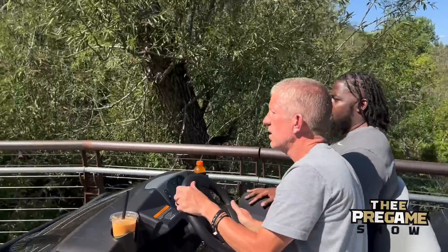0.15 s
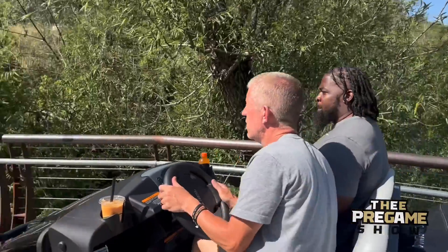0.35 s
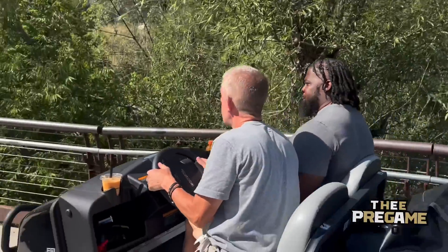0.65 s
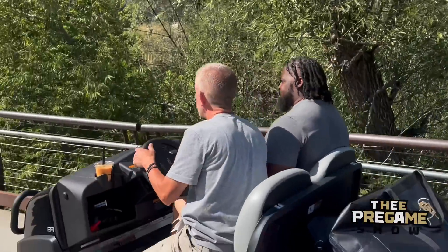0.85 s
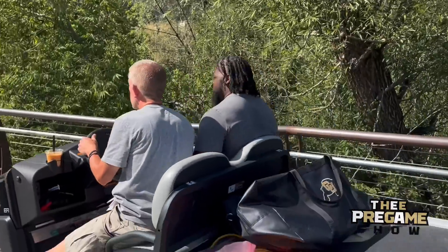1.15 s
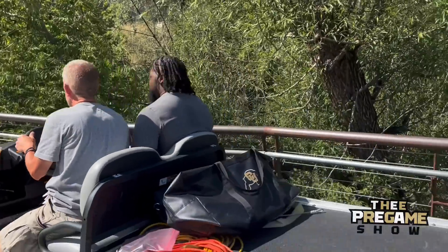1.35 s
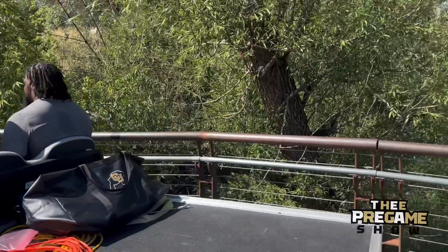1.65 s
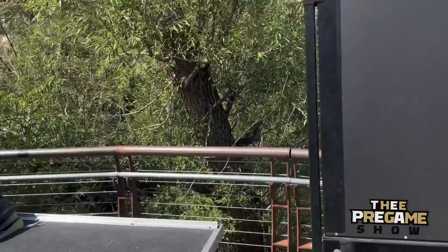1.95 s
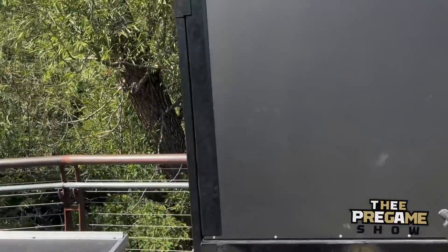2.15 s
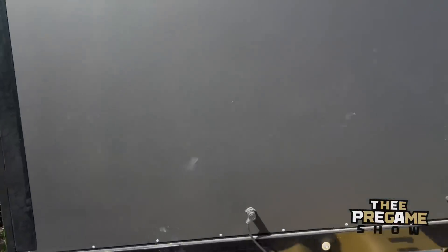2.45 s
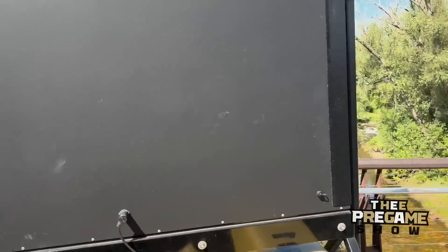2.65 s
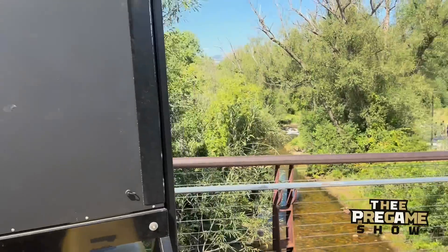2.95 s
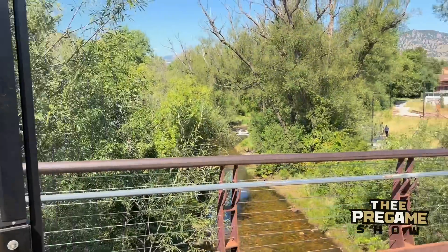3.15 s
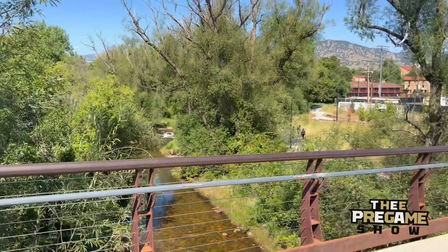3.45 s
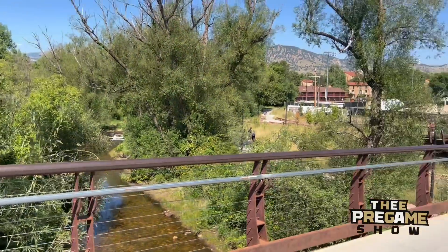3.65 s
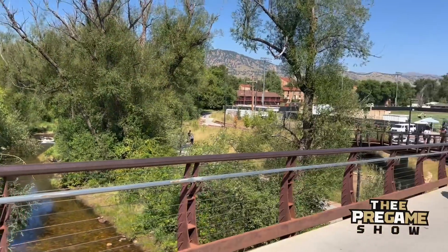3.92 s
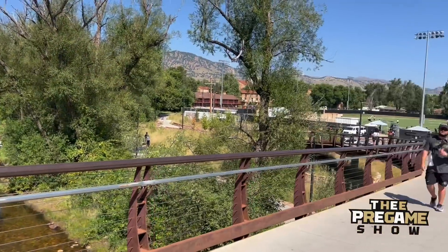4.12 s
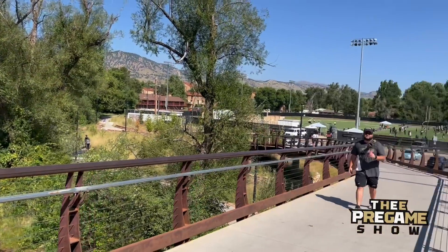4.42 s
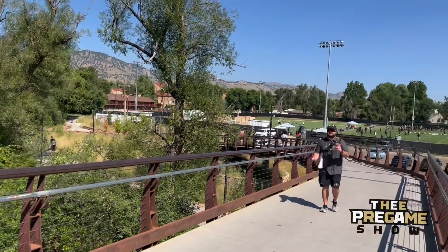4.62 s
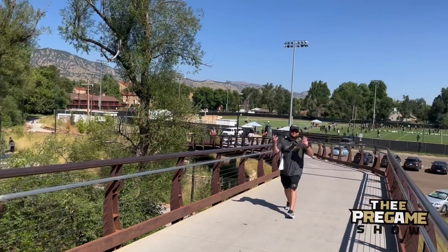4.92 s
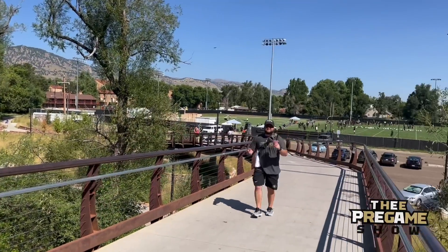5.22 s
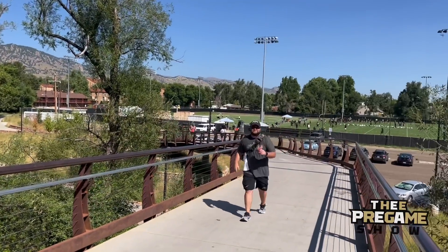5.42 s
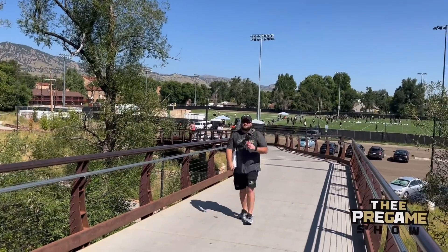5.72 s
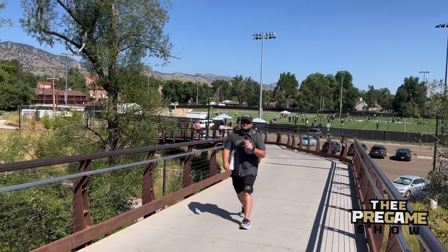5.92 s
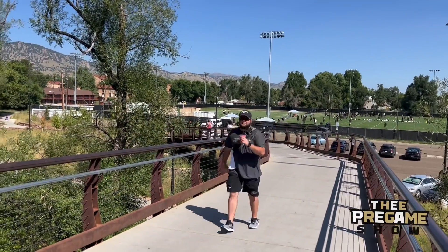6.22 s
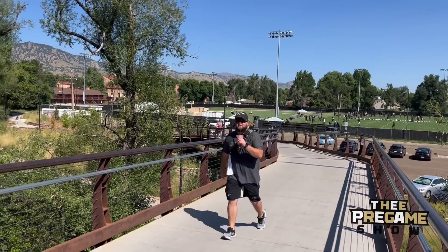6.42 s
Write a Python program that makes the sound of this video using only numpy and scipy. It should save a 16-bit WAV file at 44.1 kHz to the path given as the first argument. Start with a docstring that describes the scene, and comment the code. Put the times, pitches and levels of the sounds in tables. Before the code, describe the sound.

From 0 s a small single-cylinder utility cart engine runs close by in the open air, about fourteen firings a second: a low puttering exhaust, hollow intake puffs, tapping valves, bright casing rattle and a thin pulsing hiss. A faint steady wash of stream and leaves lies under it. Between 1.2 and 2 s its tail turns to the listener; the exhaust strengthens and a narrow hollow ring near 1.3 kHz glides slightly upward, gone by 2.5 s. The engine shifts to the left, and from about 2.5 s the rattle is partly shielded. From 3 to 4 s clatter and treble fall away, leaving a softer, duller chug that slows slightly until 5 s. At 5.2 s comes a tiny squeak, at 5.3 s a quick soft wheel knock. The throttle then opens; from 5.5 s the firings quicken to nearly twenty-five a second, the note rising into a fuller growl at 6.6 s, cut off while still revving.

```python
"""A single-cylinder utility cart idles past on a footbridge, over a steady wash of stream and leaves.
First it is heard from beside: firings sound the exhaust pipe, intake strokes ring the air box,
valves tap, the casing rattles and gas hisses once a cycle.
Its tail then turns to the listener, a hollow rings with rising pitch, and the cart moves away to the left.
Near the end a spring squeaks, a wheel knocks on the deck, the throttle opens and the engine revs up."""
import sys
import numpy as np
from scipy import signal
from scipy.fft import rfft, irfft, next_fast_len
from scipy.io import wavfile
from scipy.ndimage import uniform_filter1d

SR = 44100
rng = np.random.default_rng(int(sys.argv[2]) if len(sys.argv) > 2 else 0)


def magnitude_from_level(level_db):
    """Linear magnitude for a level in decibels (20 dB per decade)."""
    exponent = np.asarray(level_db, float) / 20
    return 10 ** exponent


def store_wav(level_fs):
    """Save 16-bit WAV to argv[1]."""
    pcm = np.round(np.clip(np.atleast_2d(level_fs), -1, 1) * 32767)
    wavfile.write(sys.argv[1], SR, pcm.T.astype(np.int16))


N = 290177

# The tail turns to the listener, later the throttle opens: from and to, s
TURN_S, THROTTLE_S = (1.237, 1.94), (5.2, 5.75)
# Where the valves first tap, and how much later their second hump follows: shares of a cycle
VALVE_AT, VALVE_OPEN = 1, 0.39
# Heard from behind, these parts speak earlier by a share of a cycle
INTAKE_EARLY, VALVE_EARLY, CASING_EARLY = 0.1203, 0.068, 0.11


def amp_of(points, hz):
    """Spectral envelope: gain of a (Hz, dB) curve read on a logarithmic frequency axis."""
    p = np.array(points)
    return magnitude_from_level(np.interp(np.log(np.maximum(hz, 1)), np.log(p[:, 0]), p[:, 1]))


def rms_one(x):
    """Normalisation: scale to unit rms over all channels."""
    return x / np.sqrt(np.mean(x ** 2) + 1e-20)


def in_time(rows):
    """Linear interpolation: each column of a table as a curve over the whole scene."""
    s, *columns = np.transpose(rows)
    return [np.interp(np.arange(N) / SR, s, c) for c in columns]


def ramp(span):
    """Linear transition: 0 before the span, 1 after it."""
    return np.interp(np.arange(N) / SR, span, [0, 1])


def colour(x, points):
    """Zero-phase filtering: multiply the spectrum by a (Hz, dB) curve."""
    size = next_fast_len(N)
    hz = np.arange(size // 2 + 1) * SR / size
    return irfft(rfft(x, size) * amp_of(points, hz), size)[..., :N]


def pair(alike, lag):
    """Interaural coherence: noise with a shared part, lag samples later on the left, and private parts."""
    alike = np.clip(alike, 0, 1)
    shared, left, right = rng.standard_normal((3, N))
    late = shared[np.clip(np.arange(N) - np.round(lag).astype(int), 0, N - 1)]
    return np.sqrt(alike) * np.array([late, shared]) + np.sqrt(1 - alike) * np.array([left, right])


def burst(cycles, at, sharp, spread_db, steady_db, echo_db=-40):
    """Cyclic modulation: two humps a cycle, their strength drawn anew each cycle, over a steady part."""
    turn = cycles - at + .5
    strength = magnitude_from_level(spread_db * rng.standard_normal(200))[turn.astype(int)]
    hump = np.exp(sharp * (-np.cos(2 * np.pi * turn) - 1))
    second = magnitude_from_level(echo_db) * np.exp(sharp * (-np.cos(2 * np.pi * (turn - VALVE_OPEN)) - 1))
    return rms_one(magnitude_from_level(steady_db) + strength * (hump + second))


def resonate(x, hz, width_hz):
    """Damped resonance: a two-pole filter with unit gain at its peak."""
    r = np.exp(-np.pi * width_hz / SR)
    feedback = [1, -2 * r * np.cos(2 * np.pi * hz / SR), r * r]
    return signal.lfilter(np.array([1, 0, -1]) * (1 - r * r) / 2, feedback, x)


def metal(cycles, at, spectrum, modes, lag, modes_db, sharp, steady_db, echo_db, alike):
    """Modal excitation: noise pulsed by the cycle, heard in a broad colour and through ringing modes."""
    pulsed = pair(alike, lag) * burst(cycles, at, sharp, 2.1, steady_db, echo_db)
    broad = rms_one(colour(pulsed, spectrum))
    push = pair(alike, lag)
    rings = 0
    for hz, width_hz, db in modes:
        # each mode has stroke strengths of its own
        stroke = push * burst(cycles, at, sharp, 2.2, steady_db - 6, echo_db)
        rings = rings + magnitude_from_level(db) * resonate(stroke, hz, width_hz)
    return rms_one(broad + magnitude_from_level(modes_db) * rms_one(rings))


# Colour of stream and leaves. Columns: frequency_hz, density_db (per Hz)
OUTDOORS_SPECTRUM = [(24, -32), (40, 0), (124, -11.5), (180, -9.5), (270, -23.5), (450, -25), (750, -32.5),
                     (1000, -27.5), (1200, -22.5), (1520, -23), (1780, -31), (2300, -35.5), (3800, -40),
                     (5500, -37.5), (9000, -41), (11000, -88)]
# Part not shared by the microphones; the bass is nearly the same at both. Columns: frequency_hz, level_db
OUTDOORS_APART = [(60, -16), (250, 4), (1000, 4)]


def outdoors():
    """Diffuse field: stationary noise whose bass is coherent between two microphones."""
    wash = pair(0.39, 0)
    common = wash.mean(axis=0)
    wash = common + colour(wash - common, OUTDOORS_APART)
    return magnitude_from_level(-38.5) * rms_one(colour(wash, OUTDOORS_SPECTRUM))


# A wheel knocks over a joint in the deck. Columns: start_s, level_db
WHEEL_KNOCKS = [(5.302, -34), (5.336, -36), (5.37, -39)]
# Ringing modes of the deck. Columns: frequency_hz, level_db, t60_s
DECK_MODES = [(249.5, 6.5, 0.06), (372, 7, 0.066), (481, 6, 0.064), (534, 10, 0.042)]


def bump():
    """Impulse response: each wheel knock sets the deck modes ringing with exponential decay."""
    out, t = np.zeros(N), np.arange(SR // 5) / SR
    for start_s, knock_db in WHEEL_KNOCKS:
        i = round(start_s * SR)
        for hz, db, t60 in DECK_MODES:
            envelope = magnitude_from_level(knock_db + db - 60 * t / t60) * (1 - np.exp(-t / 0.0067))
            out[i:i + len(t)] += envelope * np.sin(2 * np.pi * hz * t)
    return out


def squeak():
    """Sustained oscillation: a spring gives one short thin tone just before the wheel knocks."""
    share = ramp((5.23, 5.305))
    envelope = np.sin(np.pi * share) ** .5 * (share < 1)
    return magnitude_from_level(-49) * envelope * np.sin(2 * np.pi * 730 * np.arange(N) / SR)


# Resonance of a hollow under the seat. Columns: time_s, pitch_hz, level_db
HOLLOW_PATH = [(.75, 1256, -55), (1.05, 1279, -42), (1.75, 1387, -38), (2.2, 1405, -40.5),
               (2.45, 1426, -55)]


def hollow(cycles, lag, width_hz):
    """Cavity resonance: valve taps ring a hollow whose pitch slides up as the cart turns past."""
    hz, level_db = in_time(HOLLOW_PATH)
    taps = burst(cycles, VALVE_AT, 1.8, 2.7, -14, -31)
    r = np.exp(-np.pi * width_hz / SR)
    # narrow noise carried up to the moving pitch
    cos_part, sin_part = (signal.lfilter([1 - r], [1, -r], pair(0.73, lag) * taps) for _ in range(2))
    phase = 2 * np.pi * (np.cumsum(hz) - hz * np.array([lag, 0 * lag])) / SR
    return magnitude_from_level(level_db) * rms_one(cos_part * np.cos(phase) + sin_part * np.sin(phase))


# Colour of the gas hiss. Columns: frequency_hz, density_db (per Hz)
JET_SPECTRUM = [(3500, -10.5), (4900, -0.5), (7000, 1.5), (8200, -13.5), (10000, -46), (12500, -45),
                (17000, -45)]
# Ringing modes of the tailpipe. Columns: frequency_hz, width_hz, level_db
TAILPIPE_MODES = [(4920, 55, 4), (5430, 45, 0), (6010, 55, 4), (6860, 130, -0.5), (7730, 180, -2)]


def jet(cycles, load):
    """Jet noise: gas hisses through the tailpipe once a cycle, 8 dB louder under load."""
    hiss = metal(cycles, 0.21, JET_SPECTRUM, TAILPIPE_MODES, 0,
                 modes_db=-4, sharp=1.5, steady_db=-3, echo_db=-40, alike=.6)
    return magnitude_from_level(-56 + 8 * load) * hiss * magnitude_from_level([[3], [-8]])  # stronger on the left


# Colour of the casing rattle. Columns: frequency_hz, density_db (per Hz)
RATTLE_SPECTRUM = [(2500, -9), (3400, 0.5), (4400, 2), (5500, -6), (8000, 2.5), (9500, -2.5), (12000, 14.5),
                   (16000, -38), (17000, -40)]
# Ringing modes of the engine casing. Columns: frequency_hz, width_hz, level_db
CASING_MODES = [(3353, 29, 11), (3670, 90, 10), (4270, 78, 11.5), (4990, 84, 6), (6260, 41, 5),
                (7880, 300, 1)]
# Top treble of the casing against the rest. Columns: time_s, level_db
TOP_TREBLE = [(0, -17), (2.0, -19), (2.9, -19), (3.4, -17), (3.8, -34), (4.3, -41), (5.2, -31), (6.58, -33)]


def rattle(cycles, fall_db, load):
    """Structure-borne sound: the casing rattles once a cycle and falls 0.66 dB per dB of clatter lost."""
    level_db = -42 + 0.66 * fall_db
    level_db = level_db - 5.5 * ramp((2.46, 2.86)) + 4.5 * load  # the trailer hides the casing; load
    casing = metal(cycles + CASING_EARLY * ramp(TURN_S), 0.4, RATTLE_SPECTRUM, CASING_MODES, 0,
                   modes_db=-8, sharp=1.2, steady_db=-1, echo_db=-40, alike=.8)
    # distance takes the highest treble first
    treble = colour(casing, [(7000, -60), (10000, 0)])
    treble_db, = in_time(TOP_TREBLE)
    return magnitude_from_level(level_db) * (casing + (magnitude_from_level(treble_db) - 1) * treble)


# The engine passes. Columns: time_s, low_clatter_db, mid_clatter_db, left_lag_samples
PASS = [(0, -37.5, -35, 6), (.4, -34.5, -38, 9), (1.2, -36, -39.5, 1.5), (1.85, -34.5, -35, -5),
        (2.2, -35, -37.5, -11), (2.5, -37, -32, -16.5), (2.9, -36.5, -36, -20.5),
        (3.25, -39.5, -37.5, -19.5), (3.6, -42.5, -45, -19.5), (4.1, -48, -45.5, -17.5),
        (5.3, -48.5, -46.5, -12.5), (5.9, -47.5, -46, -16), (6.58, -46, -49, -14)]


def passing():
    """Source motion: level and arrival-time difference change as the engine goes by."""
    return in_time(PASS)


# Colours of the three clatter bands. Columns: frequency_hz, density_db (per Hz)
LOW_SPECTRUM = [(250, -7.5), (400, -4), (640, -9), (760, -8.5), (1100, -6), (1300, -16.5), (2000, -55)]
MID_SPECTRUM = [(800, -26), (1050, -7), (1550, 9.5), (1800, -7.5), (2400, -63)]
HIGH_SPECTRUM = [(1400, -26), (1900, 1.5), (2300, -1.5), (3000, -4), (3900, -20.5), (5000, -25)]
# Ringing parts of each band, and those struck as the valve seats. Columns: frequency_hz, width_hz, level_db
LOW_MODES = [(785, 69, 0), (871, 37, 6), (986, 520, 3)]
MID_MODES = [(1066, 57, 1.9), (1210, 30, 0.5), (1376, 33, 0.5), (1509, 28, 4), (1610, 28, 0.73)]
HIGH_MODES = [(2180, 64, -1.5), (2382, 60, -5.5)]
KNOCK_MODES = [(770, 70, -6.5), (1006, 57, -2.5), (1300, 46, -0.5), (1470, 43, 2), (1576, 43, -1),
               (2208, 39, -4), (2407, 53, -9)]


def clatter(cycles, low_db, mid_db, fall_db, lag, load):
    """Impact excitation: valve taps drive three bands of metal, and the seating valve adds a knock."""
    early = cycles + VALVE_EARLY * ramp(TURN_S)
    low = metal(cycles, VALVE_AT, LOW_SPECTRUM, LOW_MODES, lag,
                modes_db=-2.5, sharp=1.9, steady_db=12.0, echo_db=3.5, alike=0.43)
    # under load the taps run together
    mid = metal(early, VALVE_AT, MID_SPECTRUM, MID_MODES, lag,
                modes_db=3, sharp=3.5, steady_db=-4 + 9.5 * load, echo_db=-7, alike=.8)
    knock = metal(early, VALVE_AT, MID_SPECTRUM, KNOCK_MODES, lag,
                  modes_db=14, sharp=8, steady_db=-40, echo_db=-10, alike=.85)
    # as the tail swings round, the high band rings more and loses 1 dB
    swing = ramp((1.8, 3))
    high_db = -39.5 + 1.32 * fall_db - swing
    high = metal(cycles, VALVE_AT, HIGH_SPECTRUM, HIGH_MODES, lag,
                 modes_db=-6 + 7 * swing, sharp=0.43, steady_db=8.0, echo_db=6.0, alike=0.4)
    out = magnitude_from_level(low_db) * low + magnitude_from_level(mid_db) * mid
    return out + magnitude_from_level(mid_db - 6) * (1 - load) * knock + magnitude_from_level(high_db) * high


# Air box modes. Columns: frequency_hz, level_db, t60_s, signed_gain, change_from_behind_db
AIR_BOX_MODES = [(185.4, -2, 0.16, -0.64, 2), (207.7, 0, 0.2, 0.82, -3.3), (236.6, 3.5, 0.27, -0.5, -6),
                 (301.4, -6, 0.19, 0.96, -6), (345, -10, 0.12, -1.02, -3), (457, -7, 0.13, 0.6, -4)]
# Level of the intake pulses. Columns: time_s, level_db
INTAKE_LEVEL = [(0, -36), (1.2, -32), (2.2, -37.5), (2.8, -44), (3.5, -44.5), (4.1, -56.5), (5.2, -51.5),
                (5.8, -44), (6.58, -42.5)]


def intake(cycles, spread_db, soft_s, detune):
    """Transient response: each intake stroke rings the air box, softly begun and a little off pitch."""
    out, t, behind = np.zeros(N + SR), np.arange(SR // 3) / SR, ramp(TURN_S)
    early = cycles + INTAKE_EARLY * behind
    starts = np.flatnonzero(np.diff(np.floor(early - .33)))
    chance = rng.standard_normal((200, 2, len(AIR_BOX_MODES)))
    onset = 1 - np.exp(-t / soft_s)
    for i, (louder, sharper) in zip(starts, chance):
        strengths = louder + louder[0]  # part of the chance is common to all modes
        for (hz, db, t60, sign, behind_db), own, off in zip(AIR_BOX_MODES, strengths, sharper):
            level = magnitude_from_level(db + behind_db * behind[i] + spread_db * own - 60 * t / t60) * onset
            out[i:i + len(t)] += sign * level * np.sin(2 * np.pi * hz * (1 + detune * off) * t)
    # running rms of one at any speed
    level_one = out[:N] / np.sqrt(uniform_filter1d(out[:N] ** 2, SR // 2) + 1e-12)
    return magnitude_from_level(in_time(INTAKE_LEVEL)[0]) * level_one


# Engine speed. Columns: time_s, firings_per_s
SPEED = [(0.0, 14.68), (0.5, 14.03), (1.25, 13.72), (1.75, 14.7), (2.25, 15.42), (3.1, 15.24), (3.5, 15.34),
         (4.0, 15.2), (4.5, 14.78), (5.05, 14.23), (5.3, 14.57), (5.55, 15.84), (6.05, 20.93),
         (6.58, 24.66)]


def engine_speed():
    """Rotation rate: the firing frequency that sets the fundamental of every engine sound."""
    return in_time(SPEED)[0]


# Exhaust pipe; rows: beside, behind, throttle opening, under load.
# Columns: firing_point_cycles, ring_order, trail_radians, width_orders
PIPE = [(.295, 5.8, 2.5, .85), (.287, 4.55, 1.6, .9), (.28, 4.4, 2.6, .9), (.262, 4.7, 3.3, 1.4)]
# Exhaust note in the same four states. Columns: frequency_hz, level_db
NOTE_BESIDE = [(28, -33), (43, -16), (56, 1.5), (70, 0), (84, 3), (98, -4.5), (112, -7), (126, -7.5),
               (142, -14), (155, -20), (170, -15.5)]
NOTE_BEHIND = [(30, -33), (45, -9.5), (60, -0.5), (76, -0.5), (91, -19.5), (106, -2), (122, -4),
               (137, -4.5), (152, -21.5), (170, -28.5)]
NOTE_OPENING = [(33, -26), (49, -17), (65, -3.5), (82, 0.5), (98, -11), (114, 1), (130, -7), (147, -3),
                (163, -10), (180, -24), (196, -12.5)]
NOTE_LOADED = [(35, -20), (50, -3), (68, -3), (82, 2), (98, -2), (118, -7), (135, 2.5), (160, -4),
               (185, -7.5), (200, -3), (220, -16), (240, -25), (300, -31)]
# Orders that drop out under load. Columns: order, level_db
LOADED_WEAK = [(6, -6.5), (8, -11), (10, -7), (11, -1.5), (12, -2)]
# Exhaust level. Columns: time_s, level_db, change_of_orders_2_to_6_db
EXHAUST_LEVEL = [(0, -34, 2.5), (1.3, -30.5, -1.5), (2.3, -31, 0), (3.2, -33.5, -1.5), (4.1, -35, -6.5),
                 (4.9, -36.5, -5), (5.3, -37.5, 2.5), (5.6, -32.5, 0.6), (5.9, -34, 2.5), (6.58, -24, -3.5)]
# Uneven burning scatters the orders. Columns: time_s, scatter_radians
BLUR = [(0, .25), (3.5, .25), (4.8, .35), (5.2, .9), (5.5, .9), (5.75, .3), (6.58, .25)]


def exhaust(cycles, speed):
    """Harmonic series: low orders leave in step at each firing; those near the pipe's ring trail behind."""
    t = np.arange(N) / SR
    # states 0 to 3 are the rows of PIPE; the throttle is half open at 5.47 s
    stance = np.interp(t, [*TURN_S, THROTTLE_S[0], 5.47, THROTTLE_S[1]], [0, 1, 1, 2, 3])
    shares = np.clip(1 - abs(stance - np.arange(4)[:, None]), 0, 1)
    fire_at, ring_order, trail, spread = np.transpose(PIPE) @ shares
    notes = (NOTE_BESIDE, NOTE_BEHIND, NOTE_OPENING, NOTE_LOADED)
    level_db, low_db = in_time(EXHAUST_LEVEL)
    blur, = in_time(BLUR)
    # one firing is stronger than the next: 1 dB standard deviation
    level_db = level_db + 1.0 * np.interp(cycles - fire_at, np.arange(200), rng.standard_normal(200))
    out = np.zeros(N)
    for order in range(2, 13):
        hz = order * speed
        note = np.prod([amp_of(n, hz) ** share for n, share in zip(notes, shares)], axis=0)
        db = level_db + low_db * (order < 7) + shares[3] * dict(LOADED_WEAK).get(order, 0)
        lag = trail * np.exp(-((order - ring_order) / spread) ** 2)
        # level and phase wander, with 8 fresh draws a second
        draws = rng.standard_normal((2, 90))
        waver_db, stray = (np.interp(t * 8, np.arange(90), draw) for draw in draws)
        phase = 2 * np.pi * order * (cycles - fire_at) - lag + blur * stray
        out += np.sqrt(2) * note * magnitude_from_level(db + waver_db) * np.cos(phase)
    return out


def scene():
    """Superposition: all engine parts share one cycle count and add to the outdoor wash."""
    speed = engine_speed()
    cycles = 1 + np.cumsum(speed) / SR
    low_db, mid_db, lag = passing()
    fall_db = low_db + 35.5  # low clatter against its reference level
    load = ramp(THROTTLE_S)
    surroundings = outdoors() + bump() + squeak()
    casing = hollow(cycles, lag, width_hz=23) + jet(cycles, load) + rattle(cycles, fall_db, load)
    valves = clatter(cycles, low_db, mid_db, fall_db, lag, load)
    puffs = intake(cycles, spread_db=1.18, soft_s=0.005, detune=0.021) + exhaust(cycles, speed)
    return surroundings + casing + valves + puffs


def low_pass(x):
    """Removes everything above the highest recorded frequency."""
    return signal.sosfilt(signal.butter(12, 17080, fs=SR, output="sos"), x)


# Colour of the microphone pair. Columns: frequency_hz, left_minus_right_db
LEFT_MORE = [(60, 1.5), (130, 4.5), (290, 2.5), (640, 2.5), (1410, -3), (3100, 3.5), (6820, 4), (15000, -4)]


def record(dry):
    """Transducer response: the two microphones differ in colour, and a high-pass cuts the deepest bass."""
    tilt = np.array(LEFT_MORE)
    left = colour(dry[0], tilt * [1, .5])
    right = colour(dry[1], tilt * [1, -.5])
    high_pass = signal.butter(4, 42, "high", fs=SR, output="sos")
    mix = signal.sosfilt(high_pass, np.array([left, right]))
    return low_pass(mix)


dry = scene()
out = record(dry)
store_wav(out)
```